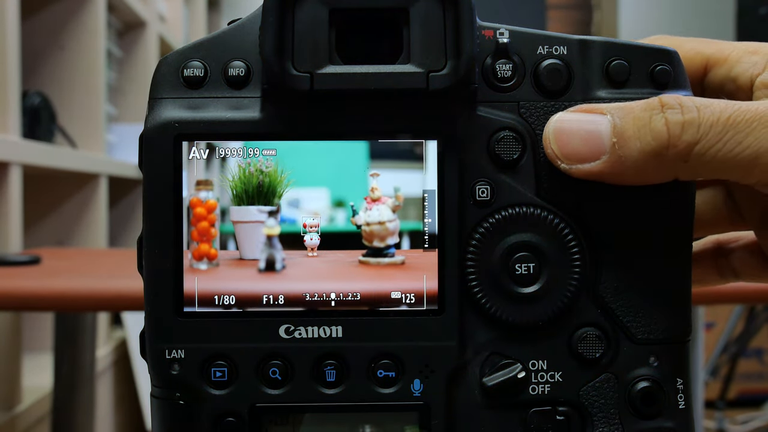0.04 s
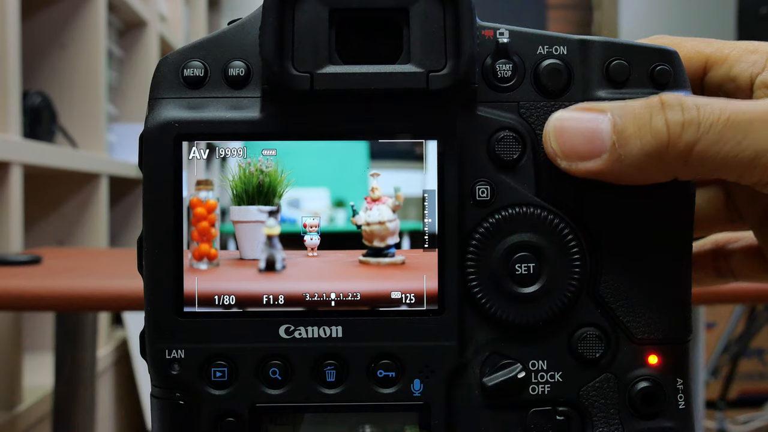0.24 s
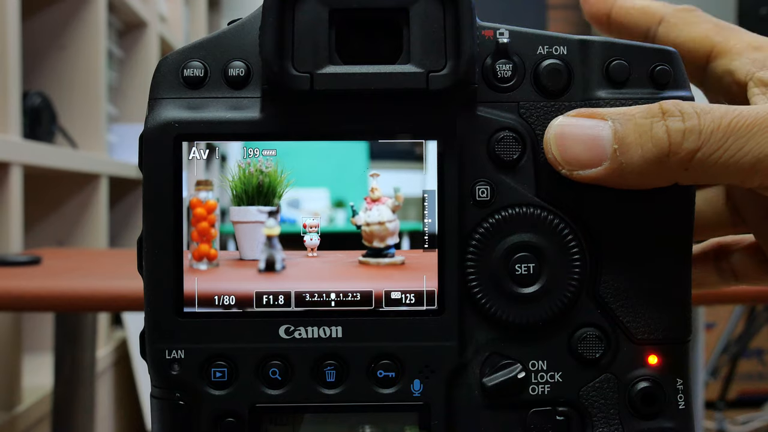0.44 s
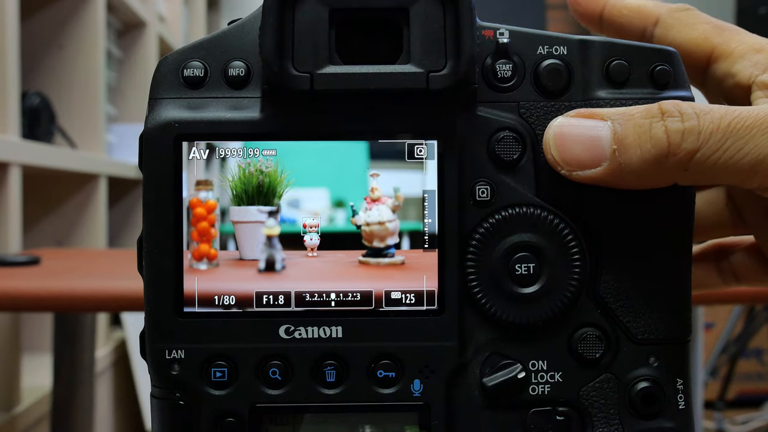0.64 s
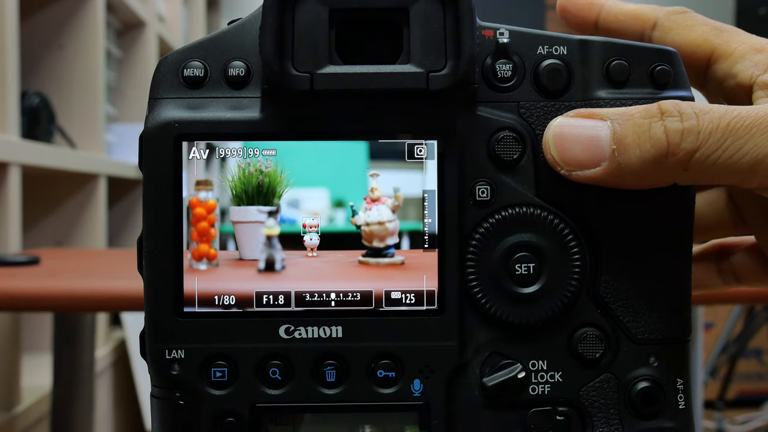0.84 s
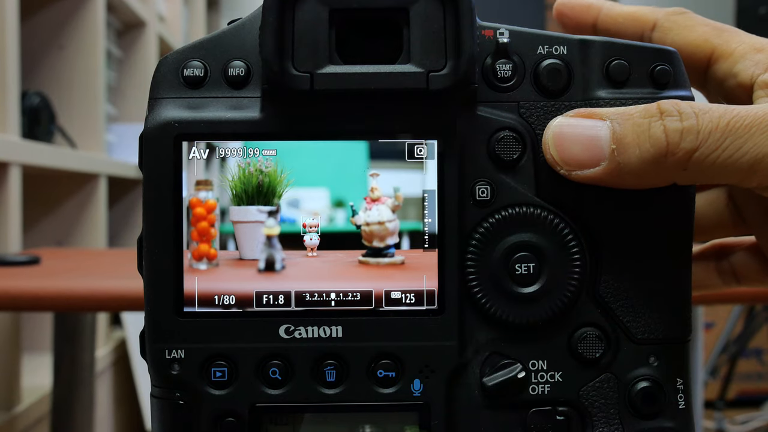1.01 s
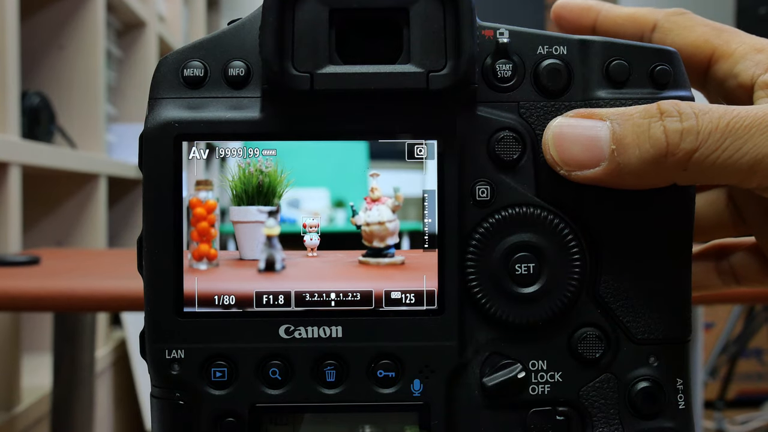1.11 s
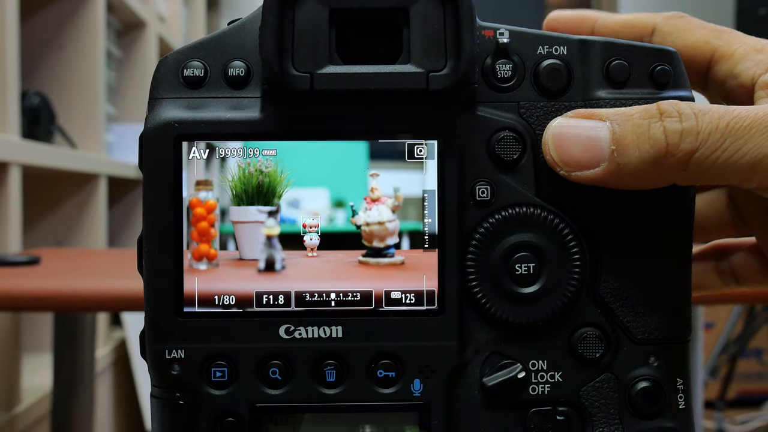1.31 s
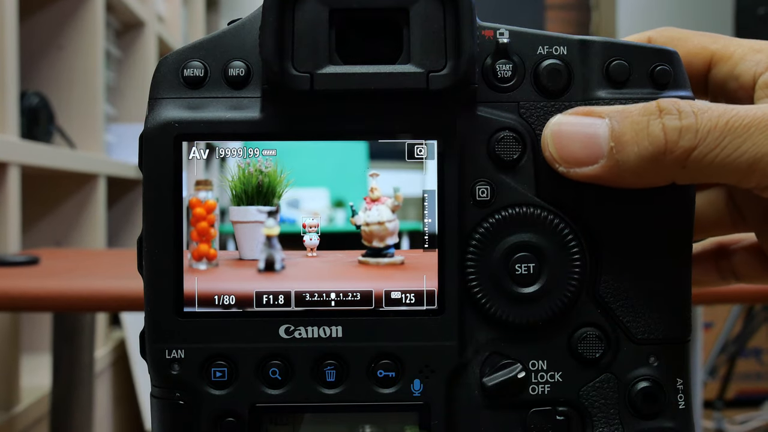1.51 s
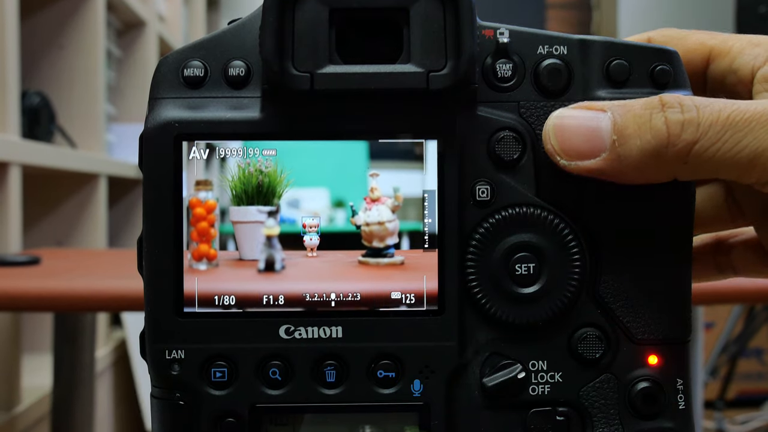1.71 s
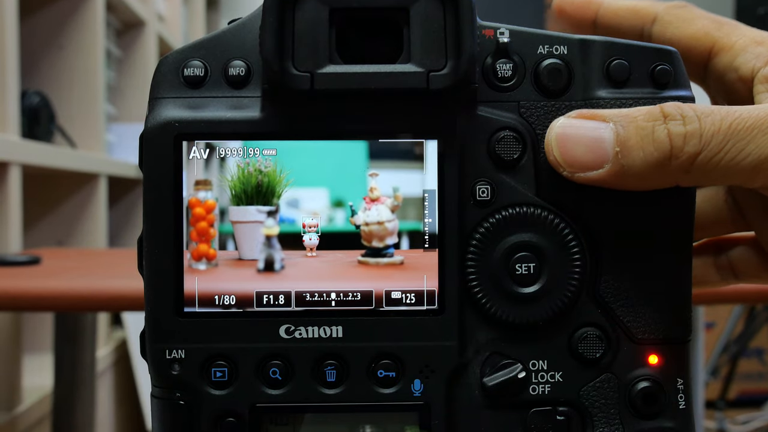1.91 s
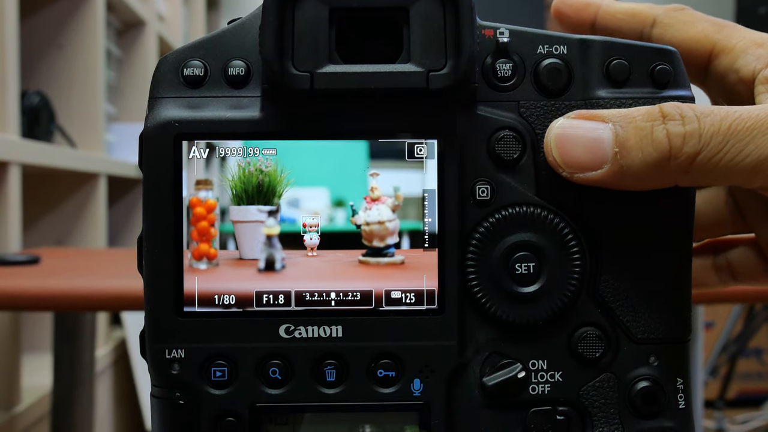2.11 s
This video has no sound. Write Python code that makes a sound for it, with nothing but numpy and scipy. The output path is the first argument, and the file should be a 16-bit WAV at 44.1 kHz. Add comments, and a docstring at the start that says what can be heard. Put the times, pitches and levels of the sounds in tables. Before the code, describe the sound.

A camera shutter snaps nearby with a sharp mechanical clatter of mirror and gears, pauses for about a second and a half, then snaps again the same way. The small room adds a brief reverberation and a faint, steady rush.

```python
"""In a small, quiet room, a reflex camera takes two pictures close to the microphone.
Each picture is an opening stroke (latch, mirror up, first curtain) and a closing stroke (second
curtain, recocking, mirror down). Impacts give broadband clacks and excite the modes of the chassis,
the gears rattle and the mirror thumps the hollow body, almost identically each time.
A finger faintly touches the button in between. The room reverberates briefly over a soft steady rush."""
import sys
import numpy as np
from scipy import signal
from scipy.fft import rfft, irfft, next_fast_len
from scipy.io import wavfile
from scipy.ndimage import uniform_filter1d

SR = 44100
rng = np.random.default_rng(int(sys.argv[2]) if len(sys.argv) > 2 else 0)


def wrap_up_sound(samples):
    """Save the sound to the file named by the first command line argument, as 16-bit audio."""
    columns = np.atleast_2d(samples).T
    # keep every value between -1 and 1, then stretch to whole-number steps
    tamed = np.clip(columns, -1, 1)
    steps = np.round(tamed * 32767).astype(np.int16)
    wavfile.write(sys.argv[1], SR, steps)


N = 94815


def undb(db):
    """Amplitude ratio of a level in decibels."""
    return 10 ** (np.asarray(db) / 20)


def curve(points, hz):
    """Interpolation of (f/Hz, value) points on a logarithmic frequency axis."""
    freqs, values = np.array(points).T
    return np.interp(np.log(hz + 1), np.log(freqs), values)


def colour(x, points, tilt_db=0):
    """Minimum-phase filter through (f/Hz, level/dB) points, tilted by tilt_db per octave about 3 kHz."""
    n = x.shape[-1]
    size = 2 * next_fast_len(n)
    hz = np.arange(size // 2 + 1) * SR / size
    gain_db = curve(points, hz) + tilt_db * np.log2(np.maximum(hz, 600) / 3000)
    cepstrum = irfft(gain_db * np.log(10) / 20)
    cepstrum[1:size // 2] *= 2  # folding makes the response causal
    cepstrum[size // 2 + 1:] = 0
    return irfft(rfft(x, size) * np.exp(rfft(cepstrum)))[..., :n]


def add(out, x, start_s):
    """Superposition of x on out from a given time."""
    i = max(int(start_s * SR), 0)
    n = min(x.shape[-1], out.shape[-1] - i)
    out[..., i:i + n] += x[..., :n]


def stereo(mid, side):
    """Left and right as the sum and difference of mid and side."""
    return np.array([mid + side, mid - side])


def burst(decay_s, size=2048, rise_s=0.00053):
    """Noise transient of unit energy with a fast rise and exponential decay."""
    t = np.arange(size) / SR
    x = rng.standard_normal(size) * np.exp(-t / decay_s) * (1 - np.exp(-t / rise_s))
    return x / np.sqrt(np.sum(x ** 2))


def mode(t, hz, t60):
    """Free vibration of a damped oscillator, falling 60 dB in t60 seconds."""
    return np.sin(2 * np.pi * hz * t) * np.exp(-np.log(1000) * t / t60)


# spectrum of the rush: f/Hz, relative level/dB
RUSH_SPECTRUM = [(15, -74), (25, -39), (49, -28), (75, -28.5), (106, -17.5), (167, -12.5), (202, -16),
                 (243, -2.5), (286, -6.5), (373, -0.5), (404, -3.5), (438, 0), (529, -12), (573, -9),
                 (655, -8.5), (709, -5), (952, -11), (1060, -10), (1390, -16), (1960, -16.5), (3830, -31.5),
                 (4620, -35), (7680, -41.5), (9770, -42.5), (15000, -52)]
# its stereo width: f/Hz, side minus mid level/dB
RUSH_WIDTH = [(60, 1.5), (200, 2.5), (380, -3.5), (1300, -4), (15000, -4)]
# its slow drift: t/s, level/dB
RUSH_LEVEL = [(0, -46), (.5, -44.5), (.7, -45), (1.0, -44.5), (1.5, -46), (2.15, -45)]

def room_rush(waver_db=0.24, left_minus_right_db=-2):
    """Filtered noise under slight amplitude modulation is heard as a soft, dull rush."""
    mid, side = colour(rng.standard_normal((2, N)), RUSH_SPECTRUM)
    waver = rng.standard_normal(N)
    for _ in range(2):
        waver = uniform_filter1d(waver, 3000, mode="wrap")
    drift_db = np.interp(np.arange(N) / SR, *np.array(RUSH_LEVEL).T)
    gain = undb(drift_db + waver_db * waver / waver.std())
    balance = undb(np.array([[1], [-1]]) * left_minus_right_db / 2)
    return stereo(mid, colour(side, RUSH_WIDTH)) * balance * gain / np.hypot(mid.std(), side.std() / 2)


# reverberation bands: f/Hz, relative level/dB, T60/s
ROOM_BANDS = [(150, -11, .25), (386, -7, 0.28), (1000, -5, 0.25), (2640, .5, 0.31), (5040, -1, 0.28),
              (9000, 0, .22), (14084, 1, 0.21)]

def reverberation(x, level_db=-6.5, side_db=-7.5, delay_s=0.0043, build_s=0.0038, size=22050):
    """Diffuse field: dense reflections build quickly, then decay at their own rate in each band."""
    t, hz = np.arange(size) / SR, np.fft.rfftfreq(size, 1 / SR)
    noise, tail = rfft(rng.standard_normal((2, size))), 0
    for centre, db, t60 in ROOM_BANDS:
        band = curve([(f, float(f == centre)) for f, _, _ in ROOM_BANDS], hz)
        tail += undb(db) * irfft(noise * band) * np.exp(-np.log(1000) * t / t60)
    tail *= 1 - np.exp(-np.maximum(t - delay_s, 0) / build_s)
    mid, side = undb(level_db) * tail / np.sqrt(np.sum(tail ** 2) / 2)
    response = stereo(mid, undb(side_db) * side)
    return signal.fftconvolve(x.mean(axis=0)[None], response)[:, :N]


# spectrum of the shutter button: f/Hz, level/dB
BUTTON_SPECTRUM = [(300, -25), (2200, -8), (3300, 9), (6500, -2.5), (9000, -27), (15000, -22)]
# finger contacts: t/s, level/dB, decay time/s, tilt/(dB per octave)
FINGER_TOUCHES = [(0.525, -28, 0.034, -3), (1.583, -29.5, .004, 0)]

def button():
    """Weak contact noise: the finger eases off the button, then takes it up for the second picture."""
    out = np.zeros((2, N))
    for start, db, decay_s, tilt_db in FINGER_TOUCHES:
        add(out, undb(db) * colour(burst(decay_s, size=4096), BUTTON_SPECTRUM, tilt_db), start)
    return out


# stereo width of an impact: f/Hz, side minus mid level/dB
IMPACT_WIDTH = [(200, -4), (1200, -12), (4500, -13), (8000, -8), (14000, -6.5)]

def contact(crack_s=0.001, casing_s=0.0064, casing_db=-1):
    """Impulsive excitation: a crack with a flat spectrum, then the short chatter of the casing."""
    spectra = rfft([burst(crack_s), burst(crack_s)])
    smoothed_power = uniform_filter1d(np.abs(spectra) ** 2, size=15)
    cracks = irfft(spectra / np.sqrt(smoothed_power))
    mid, side = (crack + undb(casing_db) * burst(casing_s) for crack in cracks)
    return stereo(mid, colour(side, IMPACT_WIDTH)) * np.linspace(1, 0, len(mid))


# spectrum of an impact: f/Hz, level/dB
IMPACT_SPECTRUM = [(60, -20), (180, -32), (300, 5), (480, -2), (650, 1.5), (950, -3), (1350, 5.5),
                   (1950, -3), (2700, -2.5), (3900, 0.5), (5400, -3.5), (6700, -3.5), (7400, -15.5),
                   (8200, -15), (9400, -9), (11000, -19.5), (14000, -20.5), (16000, -36)]

def clatter(impacts, run_s, gain_db=3, teeth_per_s=1300, size=16384):
    """Impact noise: parts hit their stops in turn while the gear teeth rattle as a Poisson process."""
    out = np.zeros((2, size))
    for start, db, tilt_db in impacts:
        add(out, undb(db) * colour(contact(), IMPACT_SPECTRUM, tilt_db), start)
    strikes = (rng.random(size) < teeth_per_s / SR) * (np.arange(size) / SR < run_s)
    strength = undb(rng.normal(loc=-20, scale=3, size=size))
    teeth = strikes * strength * np.sign(rng.standard_normal(size))
    return undb(gain_db) * (out + colour(teeth, IMPACT_SPECTRUM))


# modes of the chassis and springs: f/Hz, relative level/dB, T60/s
METAL_MODES = [(631.4, 4.5, 0.07), (1260, -2.5, 0.089), (1404, 5, 0.22), (1668, 4, 0.084),
               (2078, -2, 0.076), (2210, 7, 0.1), (2344, 1, 0.091), (2880, -8, 0.23), (2934, -8, 0.44),
               (3400, -37, 0.2), (3495, -3, 0.22), (4500, -8, .2), (4922, -14, 0.17), (5450, -17, 0.084)]
# modes of the hollow body: f/Hz, relative level/dB, T60/s, left minus right level/dB
BODY_MODES = [(278.7, -1, 0.038, 10), (309, 0.5, 0.031, 8.5), (401, -2, 0.044, 12.5), (646, -4, 0.061, -9)]

def chassis(impacts, thumps, ring_db=-43, thump_db=-22.5, push_s=0.0029, right_lag_s=0.00027):
    """Modal response: impacts set the metal ringing and the swinging mirror thumps the hollow body."""
    out = np.zeros((2, 16384))
    t = np.arange(out.shape[1]) / SR
    ring = sum(undb(db) * mode(t, hz, t60) for hz, db, t60 in METAL_MODES)
    sides = np.array([[0.5], [-0.5]])
    thump = sum(undb(db + sides * pan) * mode(t, hz, t60) for hz, db, t60, pan in BODY_MODES)
    thump *= (1 - np.exp(-t / push_s)) ** 2
    for start, db, _ in impacts:
        add(out, undb(ring_db + db) * ring, start)
    for start, db in thumps:
        left, right = undb(thump_db + db) * thump
        add(out[0], left, start)
        add(out[1], right, start + right_lag_s)
    # a steep high-pass keeps deep bass out of the thumps and ringing
    return signal.sosfilt(signal.butter(6, 215, "high", fs=SR, output="sos"), out)


# impacts of the parts within a stroke: t/s, relative level/dB, tilt/(dB per octave)
OPENING_IMPACTS = [(0.0005, -7.5, -.5), (0.0044, 0.5, 1.5), (0.0125, -4, -4.5), (0.0168, -11.5, 0),
                   (0.0241, -2, 1), (0.0307, -1.5, -1), (0.0353, -.5, -3), (0.0402, -6.5, 0)]
CLOSING_IMPACTS = [(0.0004, 2.5, 1.3), (0.0042, -7, -2.5), (0.0142, -1, 1.1), (0.0222, -6.5, -0.22),
                   (0.0267, -7, 0.8), (0.0340, -3, 1.5), (0.0400, -5, 0.15), (0.0452, 0.5, -1),
                   (0.0499, -7, -1.8), (0.0567, .5, .3), (0.0600, -7, -1.3)]
# shoves of the mirror and its drive within a stroke: t/s, relative level/dB
OPENING_SHOVES = [(0.0027, -7.5), (0.0095, -7), (0.0168, 1.5), (0.0230, -3)]
CLOSING_SHOVES = [(0.0003, -10), (0.0125, -6), (0.0273, 1), (0.0341, -4), (0.0500, -2.5)]
# pictures: opening t/s, closing t/s, level/dB, tilt/(dB per octave)
PICTURES = [(0.2122, 0.2700, 0, -.3), (1.7451, 1.8041, 0, .3)]

def shutter(opening_run_s=0.038, closing_run_s=0.076, variation_db=-8):
    """Like excitation gives like response: both strokes recur, with a little fresh clatter each time."""
    out = np.zeros((2, N))
    strokes = [(OPENING_IMPACTS, OPENING_SHOVES, opening_run_s),
               (CLOSING_IMPACTS, CLOSING_SHOVES, closing_run_s)]
    for k, (impacts, thumps, run_s) in enumerate(strokes):
        stroke = clatter(impacts, run_s) + chassis(impacts, thumps)
        for *starts, db, tilt_db in PICTURES:
            varied = stroke + undb(variation_db) * clatter(impacts, run_s)
            tilted = colour(varied, [(1, 0.017)], tilt_db)  # one point: flat apart from the tilt
            add(out, undb(db) * tilted, starts[k])
    return out


def scene():
    """Superposition of the camera's direct sound, its reverberant field and the room's rush."""
    rumble_cut = signal.butter(2, 80, "high", fs=SR, output="sos")
    camera = signal.sosfilt(rumble_cut, shutter() + button())
    return camera + reverberation(camera) + room_rush()


def record(dry, cutoff_hz=14900):
    """Band limiting: a steep low-pass filter removes the highest treble."""
    return signal.sosfilt(signal.ellip(8, .2, 70, cutoff_hz, fs=SR, output="sos"), dry)


dry = scene()
out = record(dry)
wrap_up_sound(out)
```